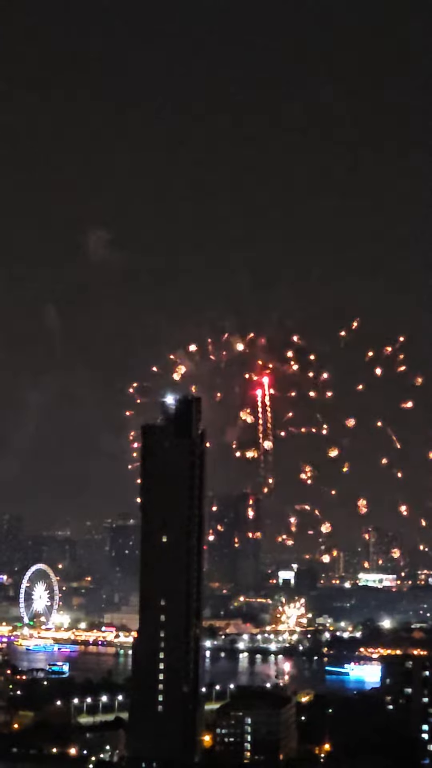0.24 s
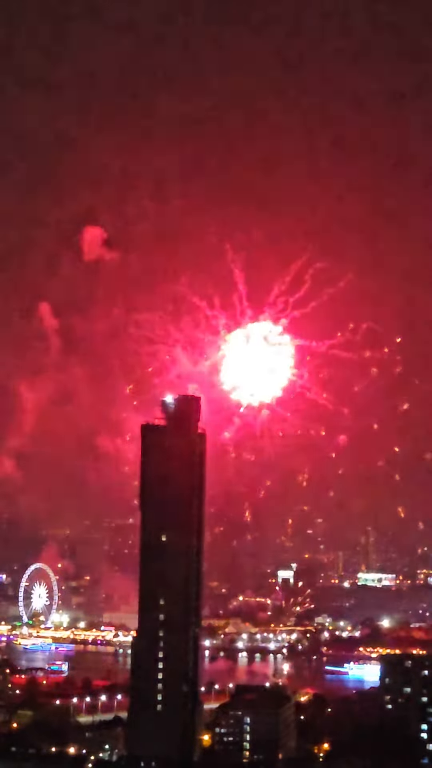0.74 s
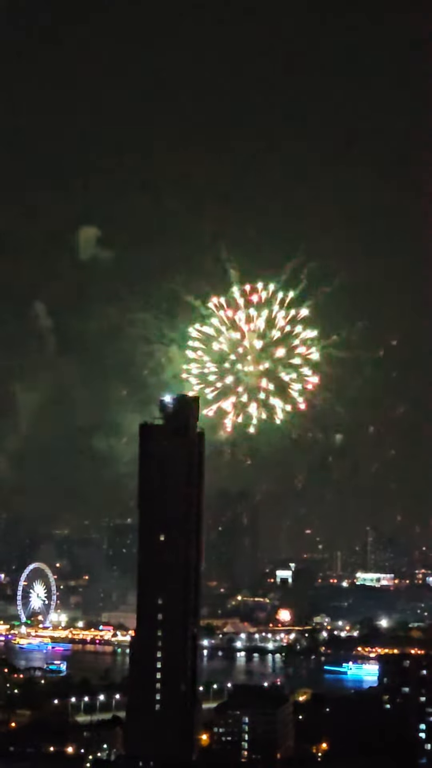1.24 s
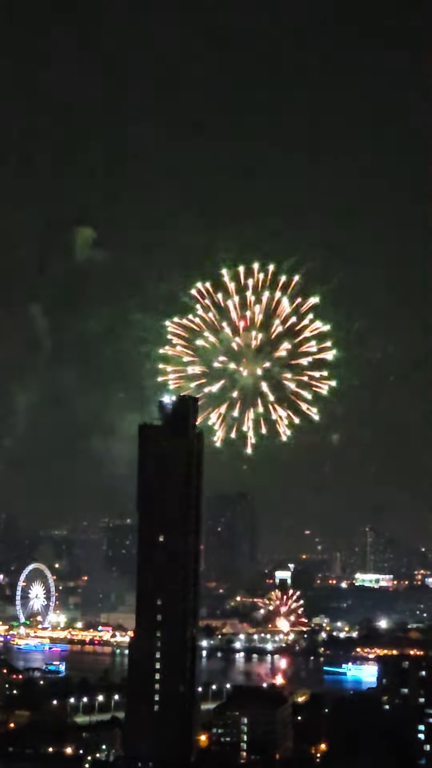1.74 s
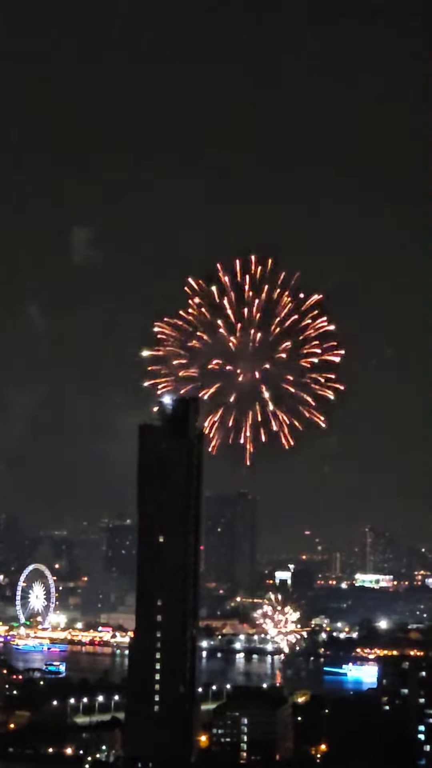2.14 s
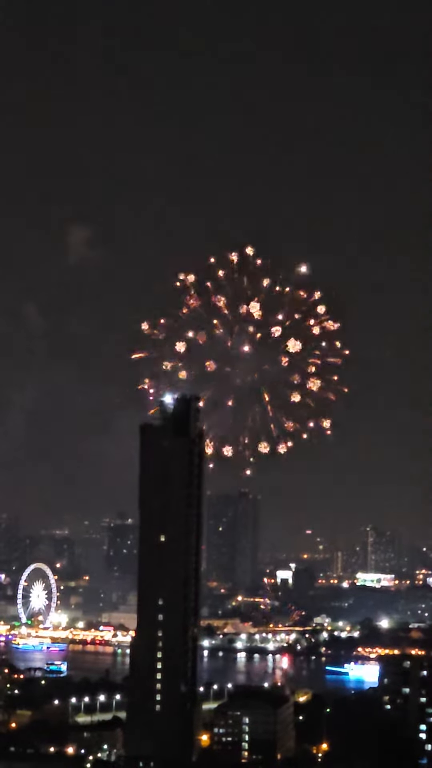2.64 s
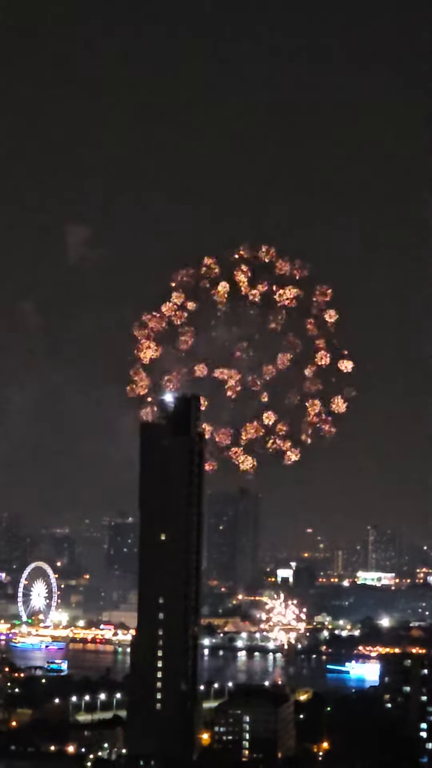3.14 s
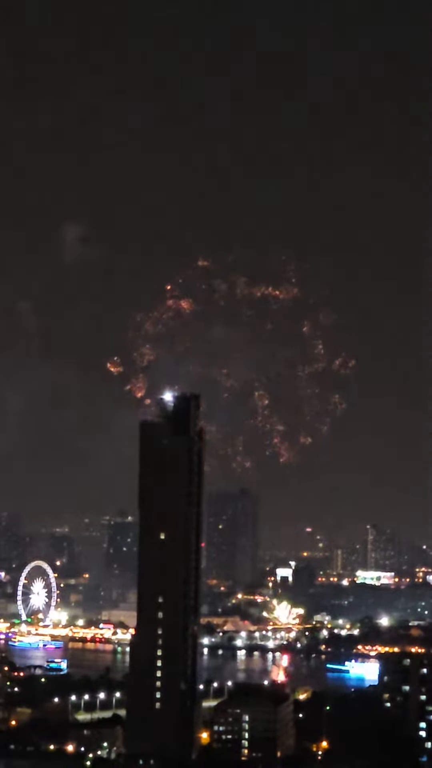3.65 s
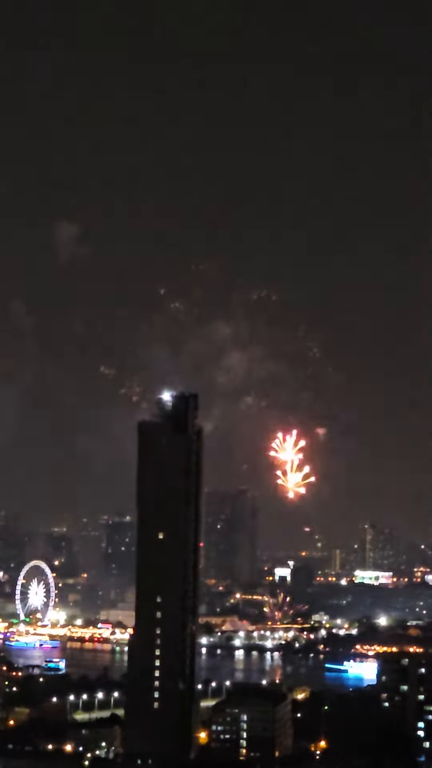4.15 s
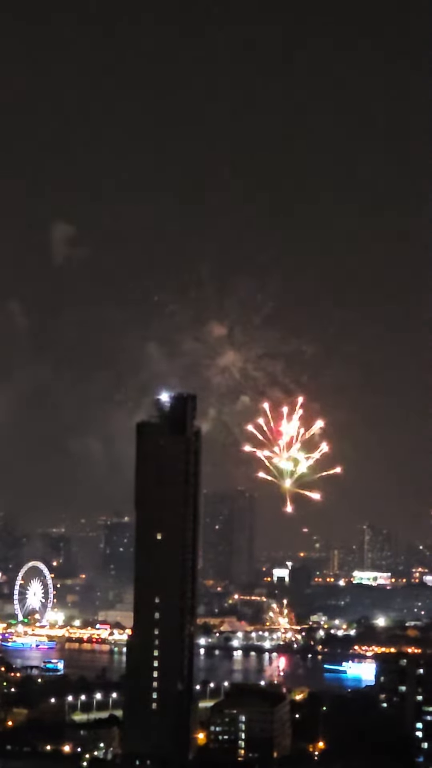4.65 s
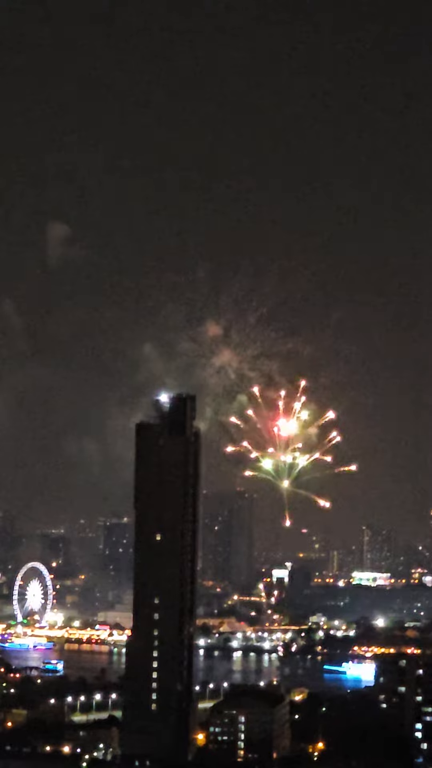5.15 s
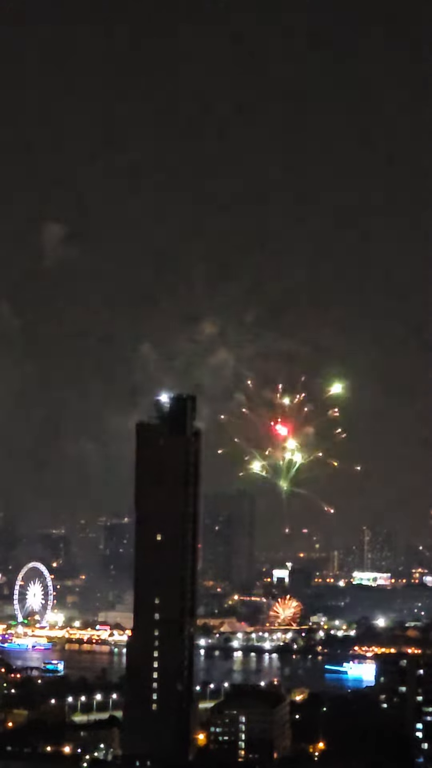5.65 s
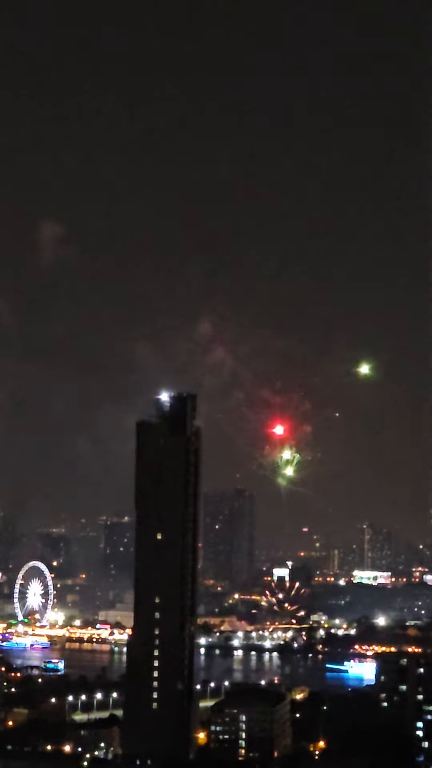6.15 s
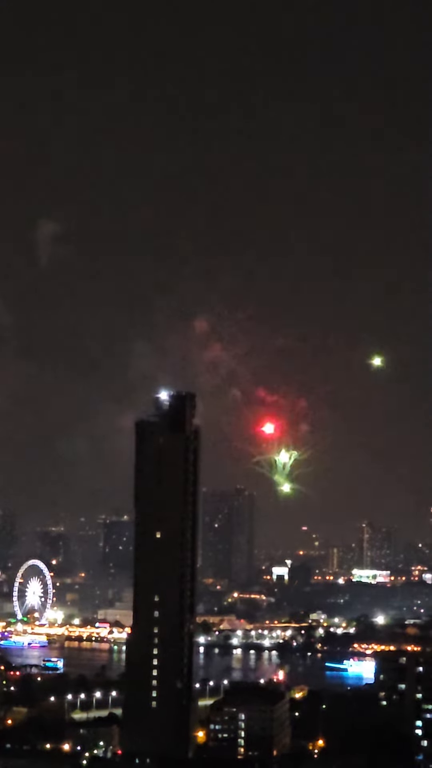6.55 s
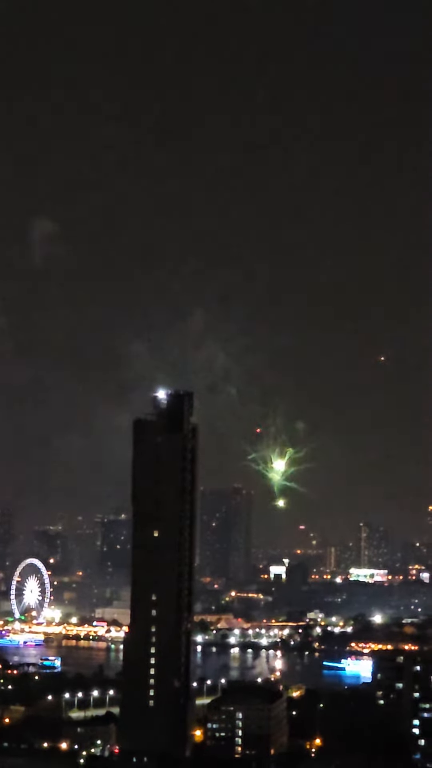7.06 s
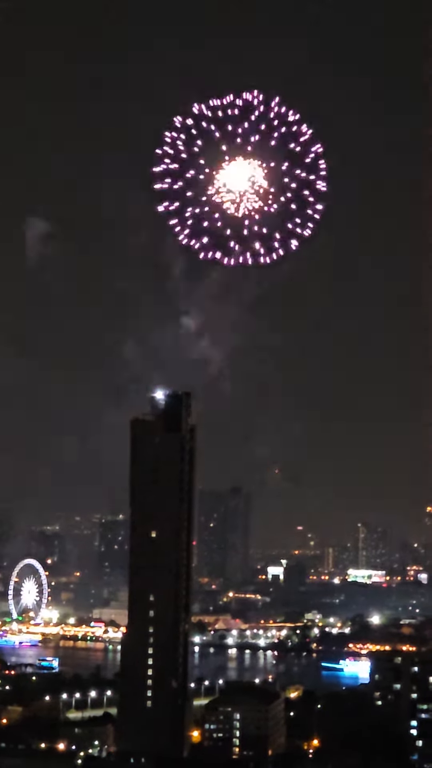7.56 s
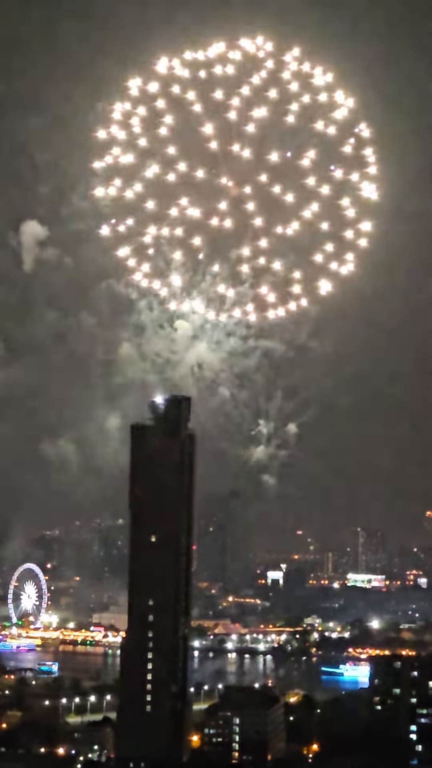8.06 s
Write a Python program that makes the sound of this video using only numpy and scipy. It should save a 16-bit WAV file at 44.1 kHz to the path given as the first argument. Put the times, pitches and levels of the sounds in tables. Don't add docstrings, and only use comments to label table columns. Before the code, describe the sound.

An uneven barrage of distant firework booms opens with blurred thuds, then strong single blasts with echoes, a lull near four seconds, a dense cluster around five to six and a half, and sparser bangs to the end. City rumble rolls underneath, faint star fizz swells, traffic hums far below. Open outdoor height, muffled treble, phone microphones in close stereo with limited peaks.

```python
import sys
import numpy as np
from scipy import signal
from scipy.fft import rfft, irfft
from scipy.io import wavfile
from scipy.ndimage import uniform_filter1d, minimum_filter1d

SR = 44100
rng = np.random.default_rng(int(sys.argv[2]) if len(sys.argv) > 2 else 0)


def gain_from_decibels(decibels):
    exponent = np.asarray(decibels, float) / 20
    return 10 ** exponent


def unload_wav(signal):
    wavfile.write(
        sys.argv[1],
        SR,
        np.round(np.clip(np.atleast_2d(signal).T, -1, 1) * 32767).astype(np.int16),
    )


N = 366030


def unit(x):
    return x / np.sqrt(np.mean(x ** 2))


def butter(x, hz, kind, order):
    return signal.sosfilt(signal.butter(order, hz, kind, fs=SR, output="sos"), x)


def over_hz(table):
    hz, value = np.transpose(table)
    bin_hz = np.arange(N // 2 + 1) * SR / N
    return np.interp(np.log(bin_hz + 1), np.log(hz), value)


def over_time(table):
    time_s, level_db = np.transpose(table)
    return np.interp(np.arange(N) / SR, time_s, level_db)


def walk(rate_hz):
    hold = int(SR / rate_hz)
    steps = np.repeat(rng.standard_normal(N // hold + 1), hold)
    return uniform_filter1d(uniform_filter1d(steps, hold), hold)[:N]


def diffuse(gate=1):
    # hz, share (0-1)
    likeness = [(60, 0.98), (320, 0.98), (550, 0.92), (960, 0.86), (1670, .74), (2900, 0.6), (6000, 0)]
    like = np.clip(over_hz(likeness), 0, 1)
    mid, side = rfft(gate * rng.standard_normal((2, N)))
    mid = mid * np.sqrt(1 + like)
    side = side * np.sqrt(1 - like)
    return irfft(np.array([mid + side, mid - side]), N)


def add(out, start_s, piece):
    i = int(start_s * SR)
    out[..., i:i + piece.shape[-1]] += piece[..., :N - i]


def city():
    # hz, level_db (per Hz)
    colour = [(22, -8), (81, -6), (204, -1.5), (346, -14), (527, -14), (1120, -20.5), (1400, -19.5),
              (1700, -27.5), (2000, -25), (2600, -35), (4000, -44), (6300, -57.5), (10000, -76.5),
              (16000, -83)]
    # time_s, level_db
    traffic = [(0.0, -42.5), (0.46, -39.5), (4.3, -38.5), (5.09, -37), (5.43, -39.5), (6.29, -40),
               (7.14, -38.5), (7.63, -40.5), (8.02, -38), (8.3, -38.5)]
    wash_db = 11.5
    grain = gain_from_decibels(1.3 * walk(20))
    wash = irfft(rfft(diffuse(grain)) * gain_from_decibels(over_hz(colour)), N)
    return gain_from_decibels(over_time(traffic) + wash_db) * unit(wash)


def squeaks():
    # start_s, length_ms, pitch_hz, level_db, octave_db (over the tone)
    squeak_rows = [
        (.525, 60, 4110, -60, -28),
        (.632, 24, 3740, -50, -17.5),
        (.68, 22, 3880, -52, -21),
        (1.97, 33, 2830, -48, -4.5),
        (1.975, 86, 2900, -54, -25.5),
        (2.475, 13, 3430, -47, -17),
        (3.575, 15, 5270, -63, -20),
        (6.893, 2.5, 3930, -43, -34),
    ]
    out = np.zeros(N)
    waver = 1 + 0.0092 * walk(400)
    for start_s, length_ms, pitch_hz, level_db, octave_db in squeak_rows:
        n = int(length_ms * SR / 1000)
        phase = 2 * np.pi * pitch_hz * np.cumsum(waver[int(start_s * SR):][:n]) / SR
        tone = np.sin(phase) + gain_from_decibels(octave_db) * np.sin(2 * phase)
        add(out, start_s, gain_from_decibels(level_db) * signal.windows.tukey(n, 0.5) * tone)
    return out


def fizz():
    # peak_s, rise_s, fall_s, hiss_db, thin_db (the higher band)
    swells = [
        (0.11, 0.16, 0.21, -45.5, -57.5),
        (0.5, 0.39, 0.49, -49, -69.5),
        (2.0, 0.12, 0.32, -52, -69.5),
        (4.4, 0.86, 0.25, -52.5, -70),
        (4.8, 0.16, 0.15, -40.5, -65),
        (5.1, .15, 0.35, -58.5, -86.5),
        (6.05, 0.4, 0.41, -51, -76),
        (6.75, 0.39, 0.52, -47, -71),
        (8.3, 0.15, .2, -59, -89),
    ]
    t = np.arange(N) / SR
    hiss_gain, thin_gain = gain_from_decibels(-72.5), gain_from_decibels(-81)
    for peak_s, rise_s, fall_s, hiss_db, thin_db in swells:
        swell = np.exp(-((t - peak_s) / np.where(t < peak_s, rise_s, fall_s)) ** 2)
        hiss_gain = hiss_gain + gain_from_decibels(hiss_db) * swell
        thin_gain = thin_gain + gain_from_decibels(thin_db) * swell
    hiss = butter(diffuse(gain_from_decibels(3.0 * walk(150))), [3300, 5200], "band", order=3)
    thin = butter(diffuse(gain_from_decibels(2.5 * walk(90))), [6800, 8900], "band", order=3)
    return gain_from_decibels(-13.5) * hiss_gain * unit(hiss) + gain_from_decibels(-7) * thin_gain * unit(thin)


def rumble():
    # time_s, level_db
    roll = [(0.0, -26), (0.25, -23.5), (0.53, -18.5), (0.78, -24), (1.38, -23.5), (2.17, -19), (2.52, -25),
            (3.19, -19), (4.21, -28), (5.02, -26.5), (5.18, -18.5), (6.01, -23), (6.29, -19), (6.49, -25),
            (6.89, -21), (7.21, -27.5), (8.0, -24.5), (8.3, -30)]
    deep_grain, upper_grain = gain_from_decibels(3 * walk(30)), gain_from_decibels(3 * walk(50))
    deep = butter(diffuse(deep_grain), [66, 130], "band", order=2)
    upper = butter(diffuse(upper_grain), [130, 260], "band", order=4)
    return gain_from_decibels(over_time(roll) - 3) * (unit(deep) + unit(upper))


def clusters():
    # start_s, peak_db, centre_hz, edge_db
    far_shells = [(0.197, -6.5, 248, -15.5), (0.675, -2, 170, -15), (1.14, -17, 87, -14),
                  (1.688, -11, 265, -8), (1.779, -13.5, 223, -7), (1.902, -5, 206.5, -15.5),
                  (2.056, -2, 152.7, -14.5), (2.536, -20, 252.5, -9.5), (3.4, -14.5, 186.6, -14),
                  (3.445, -10.5, 163, -17.5), (3.721, -8.5, 182.3, -22), (4.219, -20, 171.4, -8),
                  (4.948, -19.5, 162, -4.5), (5.162, -4, 225, -15), (5.191, -7, 220, -9.5),
                  (5.312, -7.5, 182.7, -15.5), (5.611, -7.5, 201.6, -12.5), (5.851, -15.5, 122.3, -16.5),
                  (6.376, -9, 222.5, -9.5), (6.68, -17, 202, -4), (6.834, -14, 159, -10),
                  (6.92, -11, 99.8, -10.5), (7.003, -14, 204.6, -20.5), (7.08, -11.5, 228, -19.5),
                  (7.753, -8, 199, -16), (7.839, -10.5, 205, -9.5), (7.957, -9, 94.4, -17),
                  (8.108, -6, 151, -19)]
    # start_s, peak_db, centre_hz, length_ms, edge_db
    salvo_rows = [(0.29, -3, 212, 33, -17.5), (0.335, -6, 196, 40, -25.5), (0.66, -7, 119.4, 41, -29.5),
                  (0.7, -8, 109.5, 40, -24), (1.92, -8.5, 95, 25, -24.5), (2.035, -8, 216, 32, -20),
                  (2.874, -9.5, 129.8, 42, -19.5), (3.333, -4, 129, 33, -13.5),
                  (4.644, -10.5, 190.3, 33, -11.5), (5.014, -4.5, 152, 43, -13.5),
                  (5.739, -4.5, 203, 36, -19), (6.117, -4.5, 210, 22, -17.5), (6.131, -1, 189, 22, -26),
                  (7.893, -9.5, 175, 32, -17.5)]
    # start_s, peak_db, centre_hz, length_ms
    boom_rows = [(0.329, -1.5, 122, 22), (0.359, 0.5, 95.2, 40), (0.498, -13.5, 145, 81),
                 (0.559, -4, 141.3, 28), (0.611, 1, 110.5, 31), (0.706, -6.5, 236.5, 24),
                 (0.819, -20.5, 186.6, 76), (1.319, -13.5, 76.7, 54), (2.143, -6, 147, 9.4),
                 (2.284, -3.5, 249, 17), (2.577, -4.5, 136, 9.3), (2.761, -8, 106.7, 28),
                 (3.108, -7.5, 100.2, 28), (3.5, -14, 208, 55), (3.578, -14.5, 180.5, 15),
                 (3.81, -10.5, 187, 27), (4.448, -11.5, 125.5, 31), (4.708, -7.5, 87, 25),
                 (4.8, -7.5, 103.8, 19), (5.089, -1.5, 158.5, 17), (5.261, -20, 163.5, 19),
                 (5.574, -15, 229, 47), (6.015, -5, 148.2, 24), (6.222, -4.5, 165, 22),
                 (6.295, -5, 120.8, 14), (6.372, -4.5, 144.3, 25), (6.568, -12, 166.5, 14),
                 (6.758, -15, 109.4, 29), (7.165, -14, 157.3, 30), (8.248, -15, 72.7, 14)]
    # blast_s, near_wall_db, far_wall_db, centre_hz
    echo_rows = [
        (1.224, -11.5, -24, 249),
        (1.5636, -4, -6, 201),
        (2.321, -6.5, -20, 95.5),
        (2.6495, -3.5, -6.5, 135.3),
        (3.0018, -4, -4.5, 181.7),
        (4.6784, -13.5, -19.5, 109.8),
        (4.97, -2.5, -20, 151.6),
        (5.4079, -4, -4, 174.4),
        (6.4256, -11, -24, 114),
        (7.4317, -18, -13.5, 110.2),
    ]
    # lag_ms, pitch_share (of the centre), length_ms, edge_db
    walls = [
        (23.8, 0.99, 28, -17),
        (49.8, .8, 28, -16),
    ]
    shell_ms, shell_deep_db = 22.7, -11.5
    boom_edge_db, boom_deep_db = -30, -11
    echo_deep_db = -8.5
    shells = [(s, db, hz, shell_ms, edge_db, shell_deep_db) for s, db, hz, edge_db in far_shells]
    salvos = [(*row, shell_deep_db) for row in salvo_rows]
    booms = [(s, db, hz, ms, boom_edge_db, boom_deep_db) for s, db, hz, ms in boom_rows]
    echoes = []
    for s, *levels, hz in echo_rows:
        for db, (lag_ms, share, ms, edge_db) in zip(levels, walls):
            echoes.append((s + lag_ms / 1000, db, share * hz, ms, edge_db, echo_deep_db))
    return shells + salvos + booms + echoes


def thuds():
    out, t = np.zeros((2, N)), np.arange(SR // 5) / SR
    scatter = diffuse()
    edges = butter(butter(scatter, [340, 650], "band", order=1), 670, "low", order=3)
    deeps = butter(scatter, [45, 105], "band", order=2)
    dull = butter(scatter, 300, "low", order=4)
    for start_s, peak_db, centre_hz, length_ms, edge_db, deep_db in clusters():
        first = int(start_s * SR * 0.97)
        now = slice(first, first + len(t))
        body = butter(dull[:, now], [centre_hz / 1.43, centre_hz * 1.24], "band", order=2)
        # noise, level in dB, stretch of the length
        bands = [(body, -6, 1), (edges[:, now], edge_db - 1.5, 0.7), (deeps[:, now], deep_db - 22.5, 1.3)]
        for band, band_db, stretch in bands:
            rise = 1 - np.exp(-t / (0.006 * stretch))
            shape = rise * np.exp(-(t / (stretch * length_ms / 1000)) ** 2)
            level = gain_from_decibels(peak_db + band_db) * np.sqrt(np.mean(shape ** 2))
            add(out, start_s, level * unit(shape * band))
    return out


def cracks():
    # start_s, peak_db, bright_db (over the dull part), fade_ms
    crack_rows = [(0.68, -22.5, -22, 2.6), (1.139, -21, -29, 3.6), (1.224, -11, -21, 5),
                  (1.566, -7.5, -33, 5.4), (1.613, -32, -23.5, 3.2), (2.322, -18.5, -20, 7.8),
                  (2.65, -11.5, -8.5, 4.5), (3.001, -5, -36, 5), (3.2523, -10.5, -10.5, 2.4),
                  (3.331, -14.5, -50, 7.8), (4.6772, -3.5, -32, 3.7), (4.9684, -9, -25, 4.1),
                  (5.192, -29.5, -17, 2.5), (5.4075, -5, -37, 3.1), (5.93, -10.5, -26.5, 5.4),
                  (6.118, -22, -30, 4.8), (6.405, -21.5, -18, 4.4), (6.425, -18.5, -7.5, 6.6),
                  (6.836, -21, -25.5, 4.2), (7.43, -7.5, -23.5, 4.2), (8.062, -11, -36, 9)]
    out, t = np.zeros((2, N)), np.arange(SR // 8) / SR
    scatter = diffuse()
    dull = butter(scatter, [400, 1100], "band", order=2)
    bright = butter(scatter, [1500, 3000], "band", order=2)
    for start_s, peak_db, bright_db, fade_ms in crack_rows:
        tail = gain_from_decibels(-9.5) * np.exp(-t / 0.0045)
        fade = (1 - np.exp(-t / 0.0012)) * (np.exp(-t / (fade_ms / 1000)) + tail)
        now = slice(int(start_s * SR), int(start_s * SR) + len(t))
        edge = unit(fade * dull[:, now]) + gain_from_decibels(bright_db + 5.5) * unit(fade * bright[:, now])
        add(out, start_s + 0.0017, gain_from_decibels(peak_db - 9) * np.sqrt(np.mean(fade ** 2)) * edge)
    return butter(out, 3900, "low", order=4)


def blasts():
    # start_s, peak_db, overpressure_ms, front_hz (lowpass of the air)
    blast_rows = [(1.226, -1, 1.3, 280), (1.5656, 1, 8, 300), (2.3225, 0, 10, 130), (2.6504, 1, 10, 240),
                  (3.0029, 2, 15, 400), (3.0103, -3, 6, 170), (3.2532, 2, 4, 420), (4.6788, 1, 6, 440),
                  (4.9694, 1, 6, 520), (5.0155, -3, 10, 190), (5.4087, 1, 8, 440), (5.9309, 1, 6, 460),
                  (6.4035, -3, 6, 200), (6.4256, 1, 6, 190), (7.4309, 1, 4, 190), (8.0653, -2.5, 3.2, 200)]
    mic_hz = 93
    out, t = np.zeros(N), np.arange(SR // 8) / SR
    for start_s, peak_db, overpressure_ms, front_hz in blast_rows:
        u = t / (overpressure_ms / 1000)
        wave = (1 - u) * np.exp(-u)
        rounded = butter(wave, front_hz, "low", order=2)
        sharp = butter(wave, 1600, "low", order=2)
        wave = rounded + gain_from_decibels(-24.5) * sharp
        wave = butter(wave, mic_hz, "high", order=5)
        add(out, start_s, gain_from_decibels(peak_db) * wave / np.abs(wave).max())
    return butter(out, 1900, "low", order=2)


def scene():
    return city() + squeaks() + fizz() + rumble() + thuds() + cracks() + blasts()


def band_limit(x):
    return signal.sosfilt(signal.butter(12, 15700, fs=SR, output="sos"), x)


def record(dry):
    # hz, left_minus_right_db
    lean_rows = [(60, -2.5), (92, 2.5), (140, 1.5), (220, 0.5), (340, 2.5), (520, 1.5), (800, -0.5),
                 (1220, -2), (1880, -4.5), (2900, 1)]
    # hz, left_lead_rad
    lead_rows = [(300, -.04), (690, -.2), (950, .1), (1210, -.2), (1460, .4), (1980, .2), (2330, 1.1),
                 (3100, .4)]
    ceiling = 0.99
    lean = over_hz(lean_rows) / 2
    turn = np.exp(0.5j * over_hz(lead_rows))
    x = irfft(rfft(dry) * gain_from_decibels([lean, -lean]) * [turn, 1 / turn], N)
    need = np.minimum(1, ceiling / (np.abs(x).max(axis=0) + 1e-9))
    gain = uniform_filter1d(minimum_filter1d(need, size=133), size=67)
    return band_limit(x * gain)


dry = scene()
out = record(dry)
unload_wav(out)
```